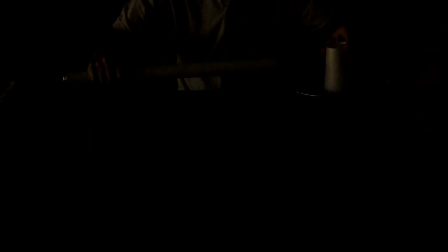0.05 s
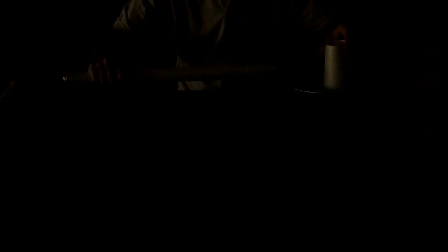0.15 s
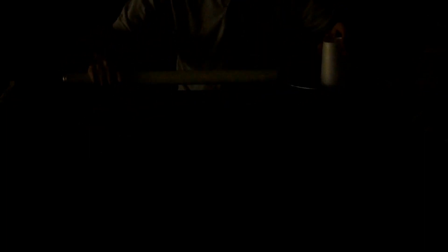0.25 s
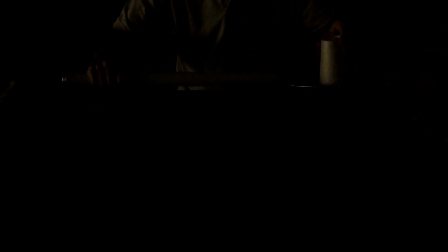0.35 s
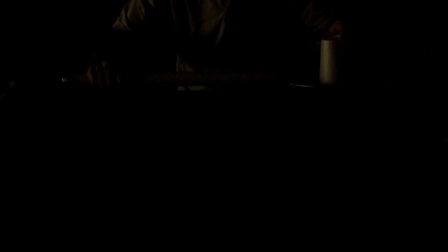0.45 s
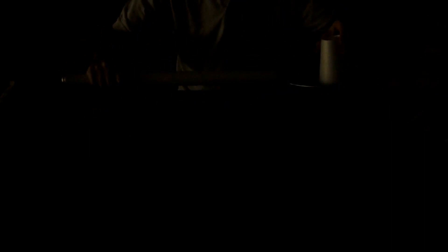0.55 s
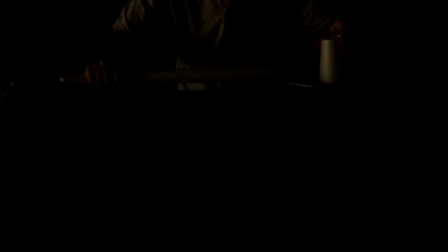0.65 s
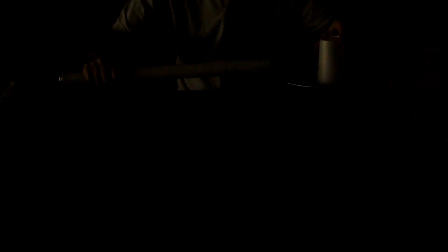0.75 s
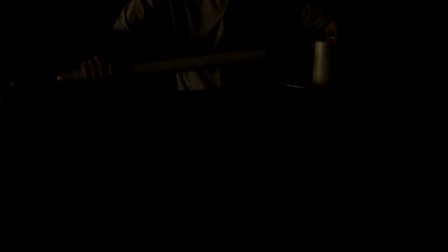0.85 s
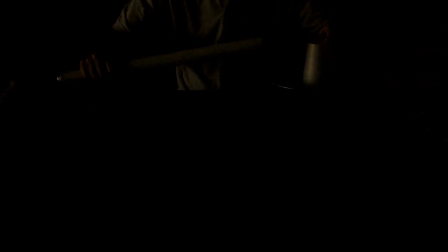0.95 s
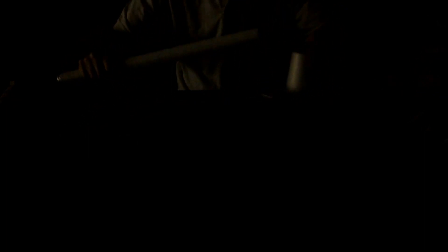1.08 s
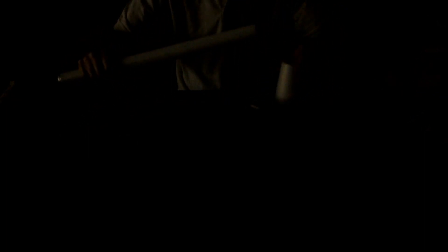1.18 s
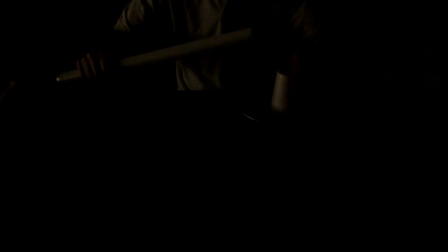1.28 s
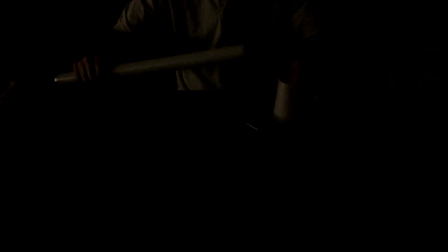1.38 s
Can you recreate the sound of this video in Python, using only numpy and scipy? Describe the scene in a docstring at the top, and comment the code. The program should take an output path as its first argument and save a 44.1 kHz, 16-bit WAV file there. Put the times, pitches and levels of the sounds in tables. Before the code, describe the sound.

A glass tube clatters on a metal pan, heard close in a small room over faint hum and hiss. At 0.23 seconds two sharp static snaps come almost as one. From 0.27 to 0.45 irregular clacks and glassy ticks weaken, with short metallic ringing, low swelling notes and a dull shuffle. Faint slides follow at 0.53 and 0.69, then soft handling from 0.7 to 1.3.

```python
"""Quiet hum, a mains tone, and hiss, filtered noise, lie underneath from start to end.
Two static sparks snap first, bright clicks with echoes, as a glass tube nears a metal pan.
The tube chatters on the pan: noise clacks and ticks, ringing tones, swelling low notes, a dull shuffle.
It then slides off lightly, as grainy noise that keeps the pan faintly ringing.
Soft handling noises, dull filtered noise, come last. A small room echoes all but the hum and hiss."""
import sys
import numpy as np
from scipy import signal
from scipy.fft import rfft, irfft
from scipy.io import wavfile
from scipy.ndimage import uniform_filter1d

SR = 44100
rng = np.random.default_rng(int(sys.argv[2]) if len(sys.argv) > 2 else 0)


def master_out(mix):
    """Clip the mix to full scale and print it as 16-bit PCM to the path in sys.argv[1]."""
    frames = np.transpose(np.atleast_2d(mix))
    ceiling = np.clip(frames, -1, 1)
    pcm = np.round(ceiling * 32767).astype(np.int16)
    wavfile.write(sys.argv[1], SR, pcm)


N = 61740  # length in samples: 1.4 s


def amp(db):
    """Turns decibels into a gain."""
    return 10 ** (np.asarray(db) / 20)


def unit(x):
    """Scales to an average strength (rms) of 1."""
    return x / np.sqrt(np.mean(x ** 2) + 1e-20)


def read(points, hz):
    """Reads a table between its points, along log frequency."""
    point_hz, value = np.transpose(points)
    return np.interp(np.log(hz + 1), np.log(point_hz + 1), value)


def add(mix, start_s, sound):
    """Mixes a sound in at its start time, cut off where the mix ends."""
    part = mix[:, round(start_s * SR):][:, :sound.shape[-1]]
    part += sound[..., :part.shape[1]]


def panned(pan_db):
    """Gains that make left louder than right by pan_db."""
    return amp(np.array([[.5], [-.5]]) * pan_db)


def noise(likeness, size):
    """White stereo noise; what both sides share sets how alike they are at each pitch."""
    shared, opposed = rfft(rng.standard_normal((2, size)))
    alike = np.clip(read(likeness, np.fft.rfftfreq(size, 1 / SR)), -1, 1)
    mid = shared * np.sqrt((1 + alike) / 2)
    side = opposed * np.sqrt((1 - alike) / 2)
    return irfft(np.array([mid + side, mid - side]), size)


def colour(x, points, tilt_db=0, size=4096):
    """Filters to the given spectrum, tilted above 2 kHz by tilt_db per octave, at unit energy."""
    hz = abs(np.fft.fftfreq(size, 1 / SR))
    octaves = np.log2(np.maximum(hz, 2000) / 2000)
    gain = unit(amp(read(points, hz) + tilt_db * octaves))
    # minimum phase: the filter answers as early as it can, never before its input
    spectrum = np.exp(np.conj(signal.hilbert(np.log(gain))))
    response = np.fft.ifft(spectrum).real[:size // 2]
    return signal.fftconvolve(x, response[None], axes=1)[:, :x.shape[1]]


CRACK_S = 0.00052  # decay time of the crack


def burst(decay_s, crack_db, likeness, size=4096):
    """Noise with a sharp crack and a fast decay, like dense resonances; unit energy."""
    t = np.arange(size) / SR
    shape = np.exp(-t / decay_s) + amp(crack_db) * np.exp(-t / CRACK_S)
    return unit(noise(likeness, size) * shape) / np.sqrt(size)


# How long the room's echo takes to fall by 60 dB: pitch_hz, fall_time_s
ROOM_FALL_TIMES = [(150, 0.32), (600, 0.56), (2200, 0.43), (6000, 0.29), (15000, 0.27)]
# How alike left and right are in the echo: pitch_hz, correlation (no unit)
ROOM_LIKENESS = [(100, 1), (300, 1), (900, 1), (3000, 0.97), (6500, 0.98), (15000, 0.61)]
ROOM_DB, ROOM_GAP_S = -7, 0.0048  # usual echo level; time the echo takes to build up


def room(x):
    """Blurred echo of a small room: noise dying away at each pitch's own pace."""
    hz, t, spectrum = signal.stft(noise(ROOM_LIKENESS, size=32768), SR, nperseg=256)
    decay = amp(-60 * t / read(ROOM_FALL_TIMES, hz)[:, None])
    tail = signal.istft(spectrum * decay, SR, nperseg=256)[1]
    tail = tail * np.minimum(np.arange(tail.shape[1]) / SR / ROOM_GAP_S, 1) ** 2
    tail = unit(tail) / np.sqrt(tail.shape[1])
    return signal.fftconvolve(x, tail, axes=1)[:, :N]


def rubs(rows, points, likeness, grain_db):
    """Friction as noise of grainy loudness, under a stroke that swells and fades roundly."""
    t = np.arange(N) / SR
    stroke = np.zeros(N)
    for start_s, length_s, level_db in rows:
        across = 2 * (t - start_s) / length_s - 1  # from -1 to 1 along the stroke
        stroke += amp(level_db) * np.sqrt(np.maximum(1 - across ** 2, 0))
    grains = amp(grain_db * unit(uniform_filter1d(rng.standard_normal(N), size=60)))
    out = colour(stroke * unit(grains * noise(likeness, N)), points)
    return out + amp(ROOM_DB) * room(out)


# How alike left and right are in the hiss: pitch_hz, correlation (no unit)
FLOOR_LIKENESS = [(25, 0.59), (60, 0.88), (120, 0.89), (200, 0.83), (380, 0.087), (700, 0.64), (1300, 0.1),
                  (3000, 0.028), (15000, 0)]
# Tone colour of the hiss: pitch_hz, relative_level_db
HISS_COLOUR = [(20, -17.5), (53, -9), (86, -12), (125, -9.5), (175, -6.5), (300, -13), (530, -10.5),
               (900, -15), (1500, -18), (4000, -21.5), (14000, -23.5), (16000, -29.5)]
HUM_HZ, HUM_DB, HISS_DB, FLOOR_PAN_DB = 119.8, -73.5, -60.5, .5


def floor():
    """Steady room noise: a pure tone for mains hum and filtered noise for hiss."""
    hum = amp(HUM_DB) * unit(np.sin(2 * np.pi * HUM_HZ * np.arange(N) / SR))
    hiss_gain = amp(read(HISS_COLOUR, np.fft.rfftfreq(N, 1 / SR)))
    hiss = irfft(rfft(noise(FLOOR_LIKENESS, N)) * hiss_gain, N)
    return panned(FLOOR_PAN_DB) * (amp(HISS_DB) * unit(hiss) + hum)


# Soft handling noises: start_s, length_s, level_db
HANDLING = [(0.71, 0.13, -61.5), (1.08, 0.18, -76.5), (1.22, 0.082, -72)]
# Their tone colour: pitch_hz, relative_level_db
HANDLING_COLOUR = [(60, -19), (170, 11), (330, -10.5), (580, 3), (1000, -8), (2500, -16), (8000, -33)]
# How alike left and right are in them: pitch_hz, correlation (no unit)
HANDLING_LIKENESS = [(100, 0.69), (600, 1), (2000, 0.49), (8000, 0.12)]


def handling():
    """Soft handling: dull, grainy friction noise."""
    return rubs(HANDLING, HANDLING_COLOUR, HANDLING_LIKENESS, grain_db=5)


# How alike left and right are in shuffle, slides and taps: pitch_hz, correlation (no unit)
NEAR_LIKENESS = [(100, 1), (300, 1), (700, 0.92), (1400, 1), (3100, 0.96), (6800, 0.76), (9000, 0.24),
                 (15000, 0.42)]
# Dull shuffles of the nudged pan: start_s, length_s, level_db
SHUFFLES = [(0.312, 0.068, -51), (0.36, 0.099, -59.5)]
# Their tone colour: pitch_hz, relative_level_db
SHUFFLE_COLOUR = [(60, -36), (170, -5.5), (300, -3.5), (450, 3), (600, -6.5), (1200, -16), (4000, -42)]


def shuffle():
    """The nudged pan shuffles: grainy friction noise, mostly low."""
    return rubs(SHUFFLES, SHUFFLE_COLOUR, NEAR_LIKENESS, grain_db=3.5)


# The pan's own ringing tones: pitch_hz, relative_level_db, time_to_fall_60_db_s
PAN_MODES = [(616.8, -8, 0.25), (641.5, -11, 0.22), (858.4, -17, 0.21), (905, -12, .2), (1043, -17, 0.18),
             (1058.6, -6, 0.21), (1281, -6, 0.083), (1942, -9, 0.17), (2014, -11, 0.13), (2070, -10, 0.09),
             (2337, -19, 0.18), (2495, -2, 0.093), (3066, -16.5, 0.2), (4560, -13, 0.11)]


def pan_ring():
    """The pan's tones start at once, each from a random point in its cycle, and die away."""
    t = np.arange(SR // 2) / SR
    ring = np.zeros(len(t))
    for pitch_hz, level_db, fall_s in PAN_MODES:
        tone = np.sin(2 * np.pi * (pitch_hz * t + rng.random()))
        ring += amp(level_db) * np.exp(-np.log(1000) * t / fall_s) * tone
    return ring


# Light slides of glass on metal: start_s, length_s, level_db
SLIDES = [(0.532, 0.064, -55.5), (0.688, 0.015, -60.5)]
# Their tone colour: pitch_hz, relative_level_db
SLIDE_COLOUR = [(200, -6.5), (650, -17), (850, -16), (1040, -1), (1300, -3), (1700, 2), (2250, 2),
                (3000, -2.5), (3900, -4.5), (4600, -3.5), (5800, -8.5), (8500, -4), (15000, -16.5)]
SLIDE_RING_DB = -10


def slides():
    """Glass rubs on the metal, and the rubbing keeps the pan faintly ringing."""
    rub = rubs(SLIDES, SLIDE_COLOUR, NEAR_LIKENESS, grain_db=2)
    ring = pan_ring()
    ringing = signal.fftconvolve(rub.mean(0), ring / np.linalg.norm(ring))[:N]
    return rub + amp(SLIDE_RING_DB) * ringing


# The pan's low notes under firm contact: start_s, level_db, starting_pitch_hz, swell_time_s
NOTES = [(0.2649, -23, 1052, .022), (0.3080, -39.5, 623, 0.014), (0.3450, -34.5, 1026, 0.0088),
         (0.3500, -43, 624.5, 0.021), (0.3850, -49.5, 420, .016), (0.4240, -36, 1062, 0.0096),
         (0.4460, -46, 1034, 0.011)]
NOTE_SAG_PER_S = 0.86  # share of the starting pitch lost per second
NOTE_SHAPE, NOTE_FLUTTER_DB, NOTE_ROOM_DB = 2.14, 1.5, -16  # a higher shape makes a narrower swell


def notes():
    """The pan's low notes swell, flutter, sag in pitch and are damped by the tube."""
    out = np.zeros((2, N))
    t = np.arange(SR // 4) / SR
    for start_s, level_db, pitch_hz, swell_s in NOTES:
        swell = (t / swell_s * np.exp(1 - t / swell_s)) ** NOTE_SHAPE  # loudest at swell_s
        wander = uniform_filter1d(rng.standard_normal(len(t)), size=200)
        flutter = unit(uniform_filter1d(wander, size=150))
        sagging_hz = pitch_hz * (1 - NOTE_SAG_PER_S * t)
        tone = np.sin(2 * np.pi * np.cumsum(sagging_hz) / SR)
        add(out, start_s, amp(level_db + NOTE_FLUTTER_DB * flutter) * swell * tone)
    return out + amp(NOTE_ROOM_DB) * room(out)


# Static sparks: start_s, level_db, treble_tilt_db_per_octave, left_over_right_db
SPARKS = [(0.234, -11, 1, 7), (0.2379, -17, 5, -17)]
# Their tone colour: pitch_hz, relative_level_db
SPARK_COLOUR = [(40, -26), (200, -5), (600, -15), (2200, -11.5), (3300, -10), (4500, -2.5), (5600, -8.5),
                (7300, -2), (10000, -4), (12300, 2), (16000, -6)]
# Echoes scattered off nearby surfaces: delay_s, level_against_the_snap_db
SPARK_ECHOES = [(.0009, -10), (0.01, -12), (.0152, -6)]
# How alike left and right are in fizz and echoes: pitch_hz, correlation (no unit)
SPARK_LIKENESS = [(200, 0.32), (3000, 0.34), (7000, 0.4), (15000, .3)]
SPARK_FIZZ_DB, SPARK_FIZZ_S, SPARK_ROOM_DB = -4, 0.0045, -4.5
SPARK_BOUNCE_S, SPARK_BOUNCE_DB = .00043, -9.5


def sparks():
    """Each discharge is one bright impulse, a bounce off the pan, scattered echoes and a short fizz."""
    out = np.zeros((2, N))
    for start_s, level_db, tilt_db, pan_db in SPARKS:
        snap = amp(SPARK_FIZZ_DB) * burst(SPARK_FIZZ_S, crack_db=-3, likeness=SPARK_LIKENESS)
        add(snap, 0, np.ones(1))
        add(snap, SPARK_BOUNCE_S, amp(SPARK_BOUNCE_DB) * np.ones(1))
        for delay_s, echo_db in SPARK_ECHOES:
            # later echoes are more spread out
            echo = burst(delay_s * 0.12, crack_db=-38, likeness=SPARK_LIKENESS)
            add(snap, delay_s, amp(echo_db) * echo)
        add(out, start_s, amp(level_db) * panned(pan_db) * colour(snap, SPARK_COLOUR, tilt_db))
    return out + amp(SPARK_ROOM_DB) * room(out)


# Taps of the tube on the pan: start_s, dull_clack_db, bright_tick_db, pan_ring_db,
# left_over_right_db (of clack and tick)
TAPS = [(0.2672, -4, -19, -53, 1.5), (0.2742, -4.5, -43, -41, 1), (0.2902, -7, -8.5, -41.5, 3),
        (0.2962, -9, -14, -37, -5), (0.3045, -10, -18, -34.5, -0.5), (0.3200, -13, -7.5, -40.5, 1),
        (0.3246, -11.5, -6, -35, 0), (0.3305, -7.5, -6.5, -39, -2), (0.3360, -13, -10.5, -60, 3),
        (0.3445, -42, -21, -53.5, -5), (0.3515, -19.5, -31, -46.5, -3), (0.3795, -25, -54, -48.5, 0),
        (0.3862, -33, -24, -65, 2), (0.4098, -15.5, -27, -43, -1), (0.4247, -15, -19, -49.5, 1),
        (0.4298, -19.5, -19, -82, -1), (0.4500, -21, -32, -56.5, 2)]
# Tone colour of the clack: pitch_hz, relative_level_db
CLACK_COLOUR = [(60, -45), (200, -11.5), (450, -15.5), (850, 0), (1400, -0.5), (1750, -4.5), (2400, 3.5),
                (3100, -3.5), (3800, -7), (4700, -5.5), (6200, -14.5), (15000, -13.5)]
# Tone colour of the tick: pitch_hz, relative_level_db
TICK_COLOUR = [(300, -18.5), (2000, -15), (4700, -5.5), (6300, -6), (8700, 4.5), (9800, 0.5), (11800, 2.5),
               (14000, -3), (16000, -13.5)]
CLACK_DECAY_S, TICK_DECAY_S, CRACK_DB = 0.012, 0.0067, -12


def taps():
    """Every contact gives a dull clack, a glassy tick and a ring of the pan's own tones."""
    out = np.zeros((2, N))
    for start_s, clack_db, tick_db, ring_db, pan_db in TAPS:
        clack = colour(burst(CLACK_DECAY_S, CRACK_DB, NEAR_LIKENESS), CLACK_COLOUR)
        tick = colour(burst(TICK_DECAY_S, CRACK_DB, NEAR_LIKENESS), TICK_COLOUR)
        add(out, start_s, panned(pan_db) * (amp(clack_db) * clack + amp(tick_db) * tick))
        add(out, start_s, amp(ring_db) * pan_ring())
    return out + amp(ROOM_DB) * room(out)


def scene():
    """Sparks, contact, slides and handling over the room's steady floor."""
    return floor() + handling() + shuffle() + slides() + notes() + sparks() + taps()


CUTOFF_HZ = 15900


def record(dry):
    """The recorder's band limit: a steep filter removes the highest treble."""
    low_pass = signal.firwin(401, CUTOFF_HZ, window=("kaiser", 9), fs=SR)
    return signal.oaconvolve(dry, low_pass[None], "same")


dry = scene()
out = record(dry)
master_out(out)
```